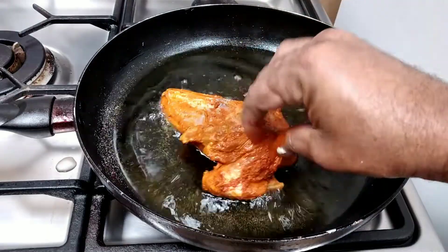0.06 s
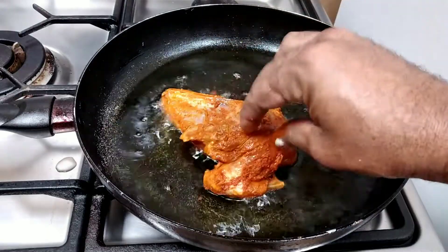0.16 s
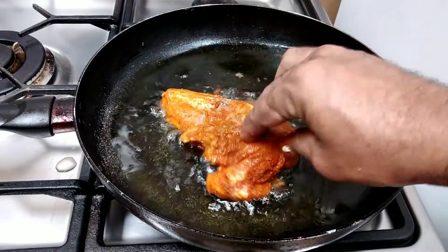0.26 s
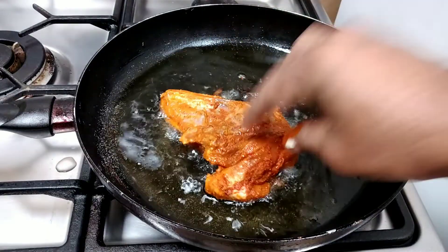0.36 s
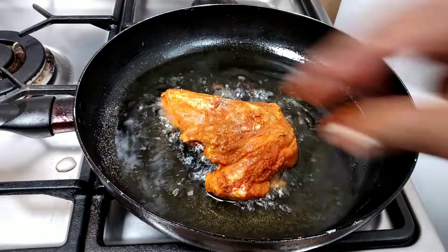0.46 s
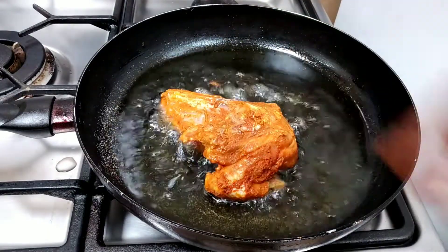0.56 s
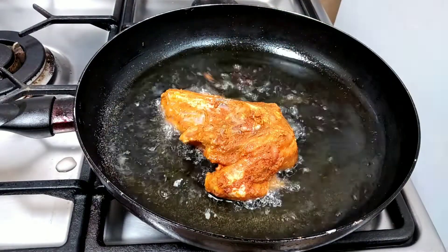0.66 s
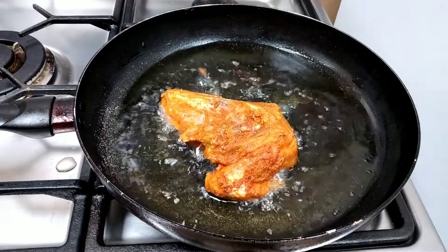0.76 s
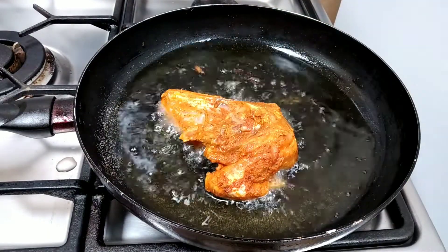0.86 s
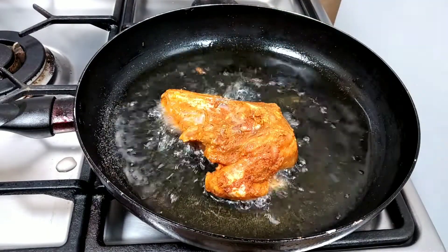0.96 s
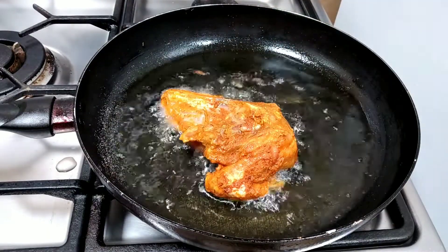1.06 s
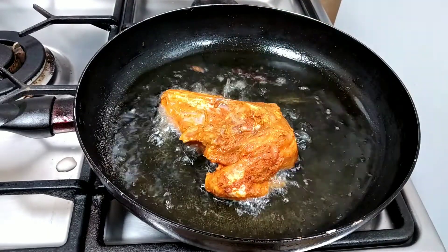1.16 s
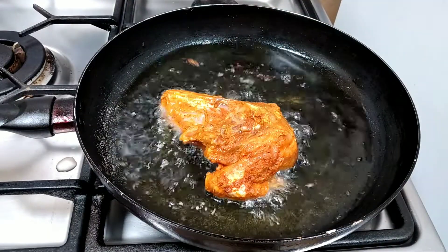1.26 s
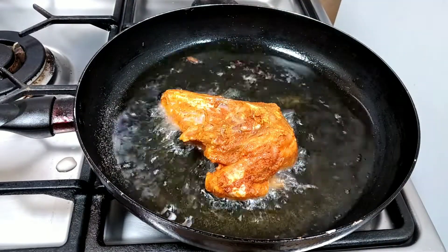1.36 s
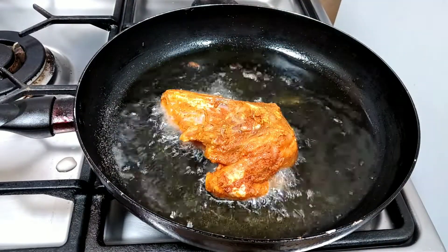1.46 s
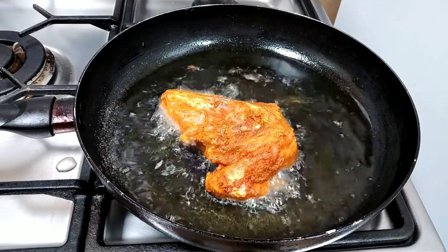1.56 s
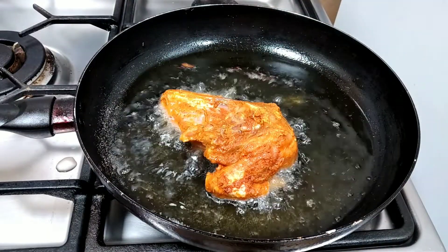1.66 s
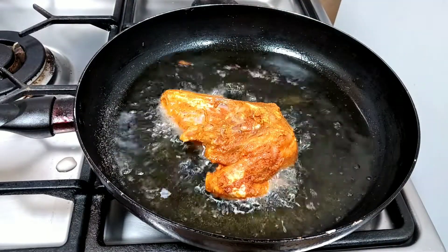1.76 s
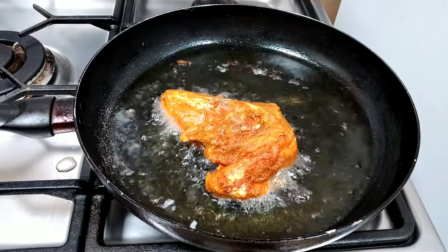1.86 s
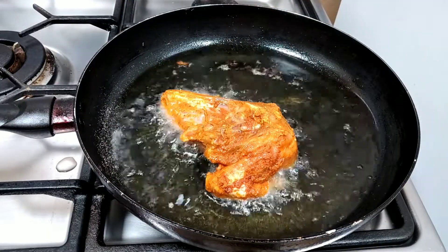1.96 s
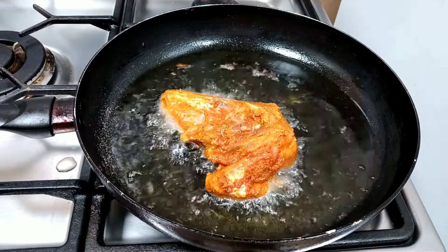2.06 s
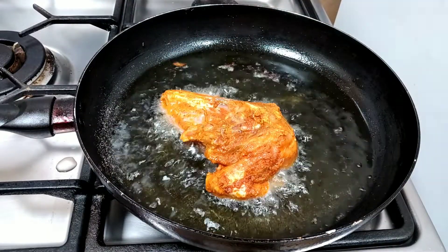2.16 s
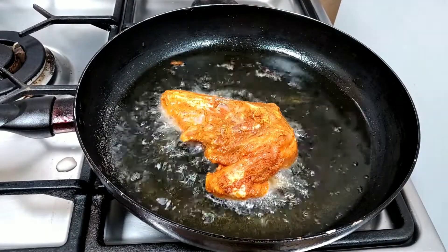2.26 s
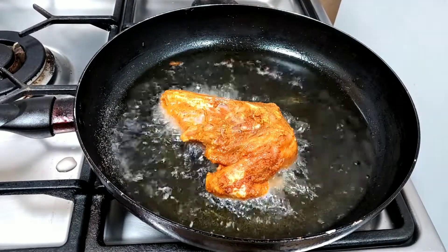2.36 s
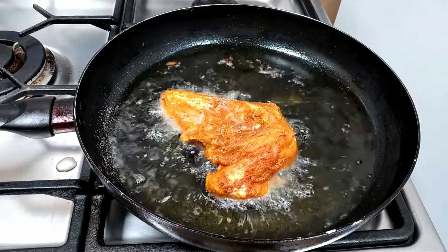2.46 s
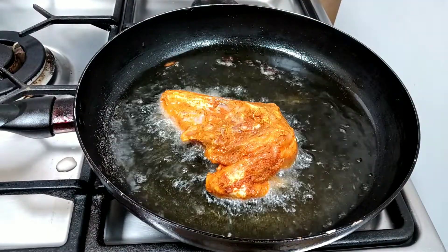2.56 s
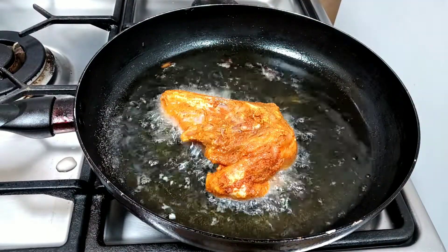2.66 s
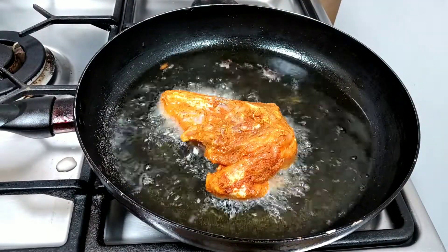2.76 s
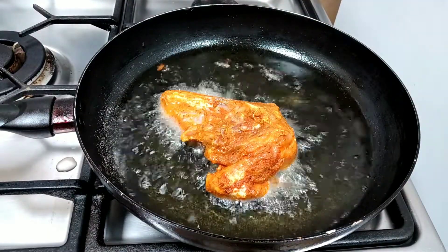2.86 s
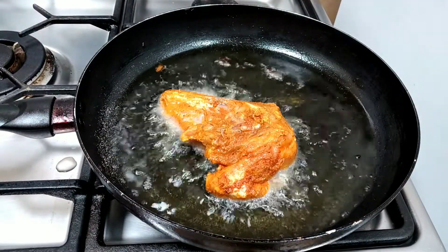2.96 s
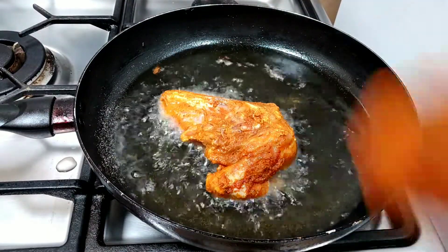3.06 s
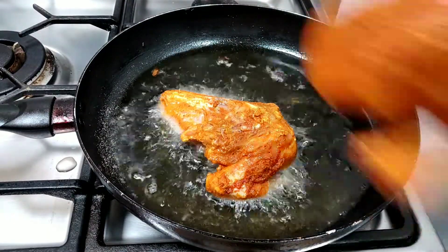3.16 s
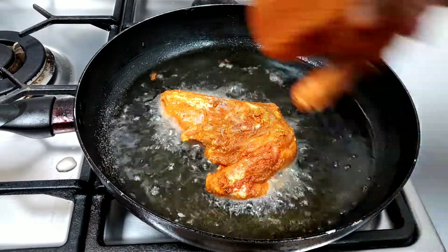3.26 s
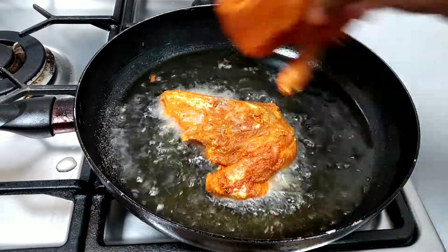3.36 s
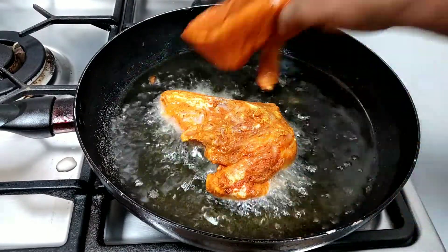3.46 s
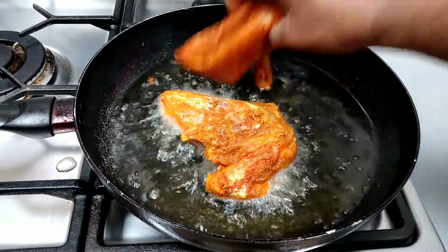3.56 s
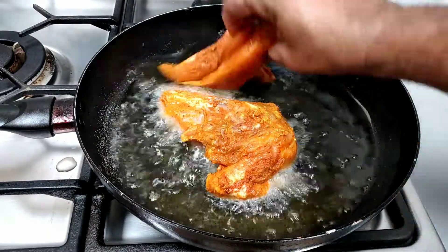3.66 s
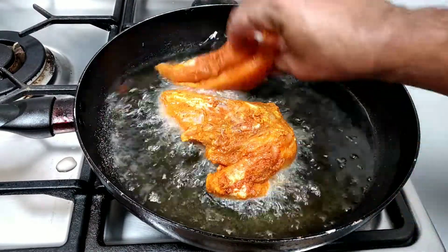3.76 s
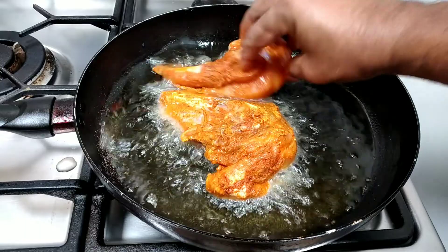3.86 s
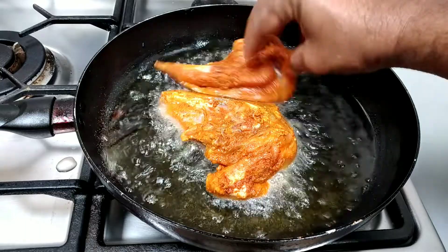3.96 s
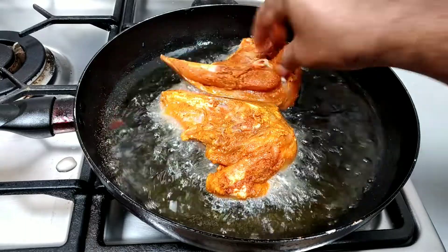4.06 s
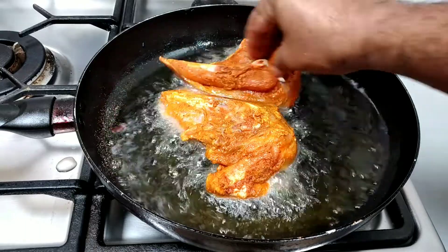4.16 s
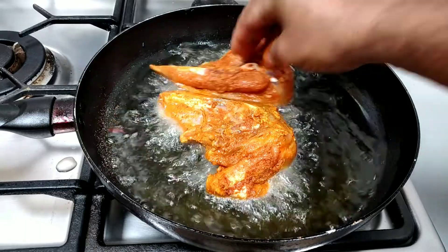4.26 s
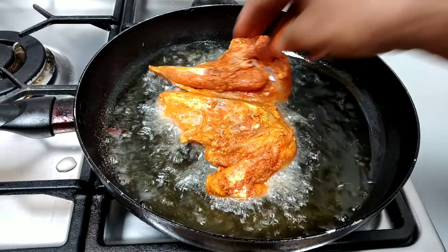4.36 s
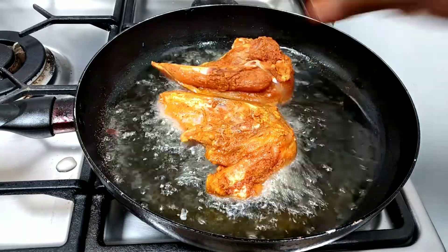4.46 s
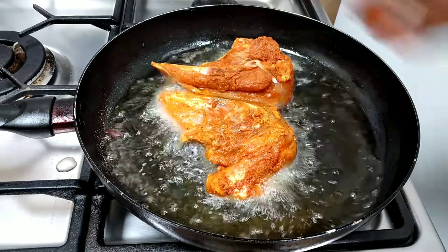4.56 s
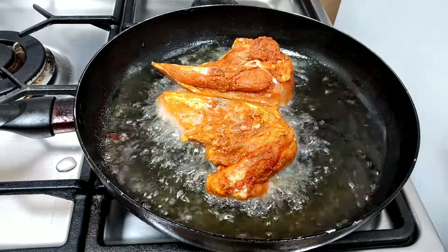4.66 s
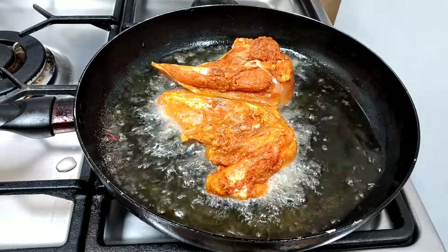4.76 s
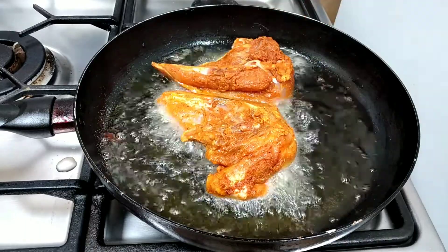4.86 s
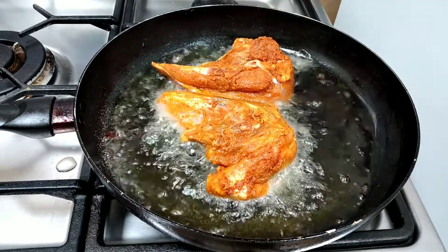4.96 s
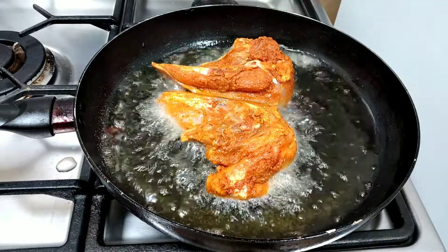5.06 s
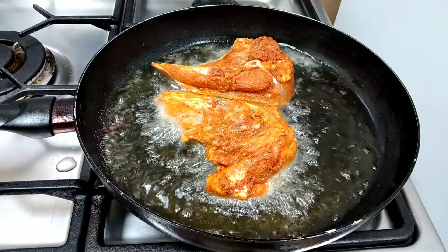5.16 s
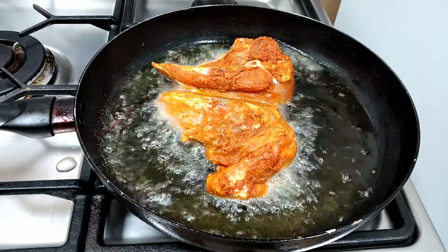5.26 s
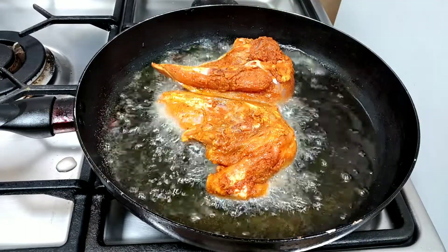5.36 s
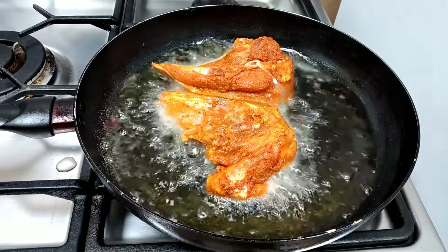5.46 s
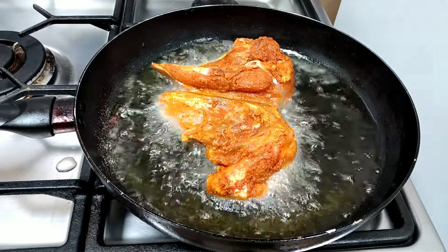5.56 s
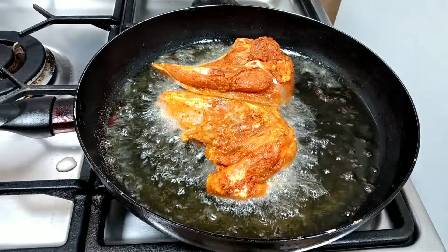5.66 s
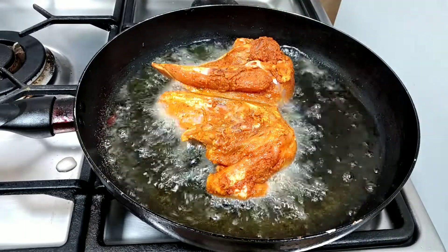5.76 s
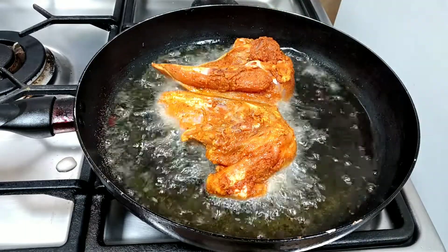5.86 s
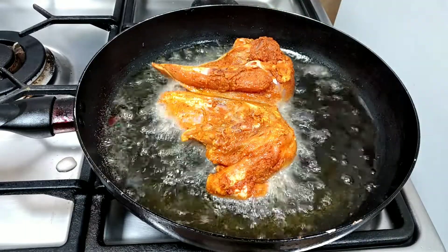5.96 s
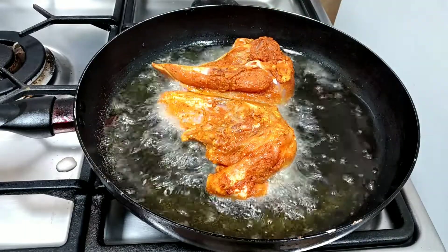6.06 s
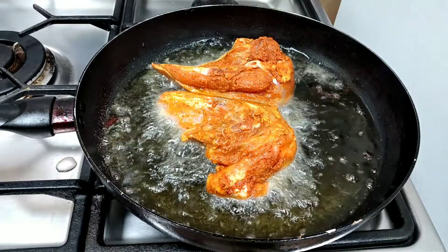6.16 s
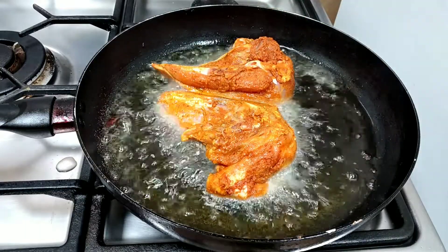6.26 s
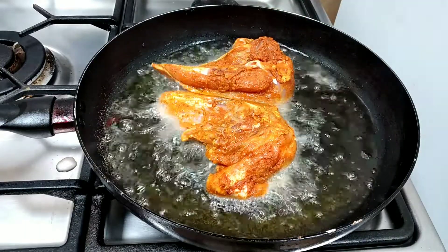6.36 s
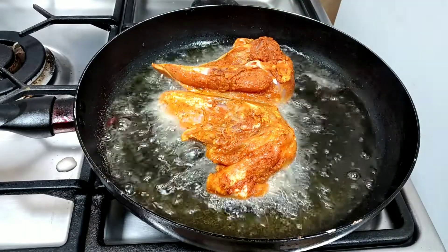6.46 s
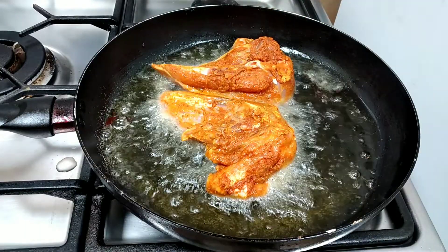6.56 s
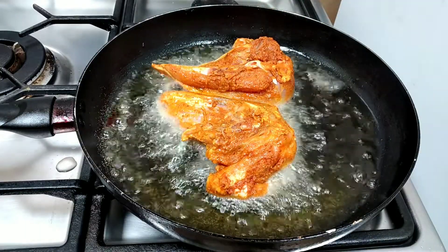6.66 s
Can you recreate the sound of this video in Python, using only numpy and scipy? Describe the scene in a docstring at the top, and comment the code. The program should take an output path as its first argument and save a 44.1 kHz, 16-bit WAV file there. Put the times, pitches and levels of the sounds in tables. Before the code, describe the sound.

Wet marinated chicken is lowered into hot oil, spluttering and popping, dying to a faint simmer, then a second piece erupts louder with hissing steam.

```python
"""Two marinated chicken pieces splutter in hot oil in a pan, close to a stereo microphone in a small kitchen.
Their wet coats boil off as swarms of ringing bubbles that rise in pitch, with splats, strings and big pops.
Fine droplets fizz and snap as clumped impulses; trapped steam hisses and squirts as filtered crackle.
A kitchen appliance hums behind it as wavering sines over soft air and burner noise."""
import sys
import numpy as np
from scipy import signal
from scipy.fft import rfft, irfft
from scipy.io import wavfile
from scipy.ndimage import uniform_filter1d

SR = 44100
rng = np.random.default_rng(int(sys.argv[2]) if len(sys.argv) > 2 else 0)


def int16_out(signal):
    """Quantize to a 16-bit WAV file."""
    q = np.round(np.clip(np.atleast_2d(signal).T, -1, 1) * 32767)
    wavfile.write(sys.argv[1], SR, q.astype(np.int16))


N = 296352
TIME = np.arange(N) / SR


def gain_of(db):
    """Decibels to amplitude."""
    return 10 ** (np.asarray(db) / 20)


def evened(x):
    """Scales to rms 1."""
    return x / np.sqrt(np.mean(x ** 2) + 1e-20)


def steadied(x, size=5000):
    """Keeps the grain of a sound but holds its slow level at 1."""
    power = uniform_filter1d((x ** 2).mean(0), size)
    return x / np.sqrt(abs(power) + 1e-12)


def read(points, hz):
    """Reads a spectrum table on a log-frequency axis."""
    f, value = np.transpose(points)
    return np.interp(np.log(hz + 1), np.log(f + 1), value)


def colour(points, size=2048):
    """Causal (minimum-phase) impulse response with the given spectrum."""
    log_gain = np.log(gain_of(read(points, abs(np.fft.fftfreq(size, 1 / SR)))))
    spectrum = np.exp(np.conj(signal.hilbert(log_gain)))
    return np.fft.ifft(spectrum).real[:size // 2]


def convolve(x, response):
    """Passes both channels through an impulse response."""
    return signal.oaconvolve(x, np.atleast_2d(response), axes=1)[:, :x.shape[1]]


def resonate(x, hz, width_hz):
    """A resonance of gain 1 that can glide: shift to 0 Hz, low-pass, shift back."""
    turn = np.exp(2j * np.pi * np.cumsum(hz * np.ones(x.shape[-1])) / SR)
    r = np.exp(-np.pi * width_hz / SR)
    return 2 * (turn * signal.lfilter([1 - r], [1, -r], x / turn + 1e-18)).real


def add(mix, s, sound):
    """Adds a stereo sound at time s."""
    part = mix[:, max(round(s * SR), 0):][:, :sound.shape[1]]
    part += sound[:, :part.shape[1]]


def placed(db, pan_db):
    """Left and right gain of a sound."""
    return gain_of([[db + pan_db / 2], [db - pan_db / 2]])


def apart(sound, lag_s):
    """A sound that reaches the left port a little after the right one."""
    late = abs(round(lag_s * SR))
    return np.array([np.pad(sound, (late, 0)), np.pad(sound, (0, late))])


def envelope(start_s, rise_s, hold_s, fade_db_per_s):
    """A straight rise, a hold, and a steady fade in dB."""
    age = TIME - start_s
    fade_s = np.maximum(age - rise_s - hold_s, 0)
    return np.clip(age / rise_s, 0, 1) * gain_of(-fade_db_per_s * fade_s)


def swell(middle_s, length_s):
    """One smooth arch of height 1."""
    return np.cos(np.pi * np.clip((TIME - middle_s) / length_s, -.5, .5))


def flutter(depth_db, slow_hz=5., fast_hz=41.01, count=24):
    """An uneven random gain: sines of random phase, summed to an rms depth in dB."""
    t, hz = TIME[::100], np.geomspace(slow_hz, fast_hz, count)[:, None]
    wave = (np.sin(2 * np.pi * (hz * t + rng.random((count, 1)))) / hz ** 0.11).sum(0)
    return np.interp(TIME, t, gain_of(depth_db * evened(wave)))


def bursts(per_s, spread_db, lag_s, scatter_s, echo=0.6, echo_s=.003, count=3):
    """Random impulses of scattered height, each with its own delay between the ports and its own echoes."""
    draws = rng.random((int(per_s * N / SR) + 1, 4 + 2 * count)).T
    when, big, place, side = draws[:4]
    height = gain_of(spread_db * np.minimum(-np.log(1 - big), 4.2))
    height = height * (-1) ** np.arange(len(when))
    late = lag_s + scatter_s * (2 * place - 1)  # right port; negative: right first
    lean = gain_of(4.9 * (2 * side - 1))
    strength = np.r_[1, echo * (-1) ** np.arange(count)][:, None]  # direct sound, then its echoes
    ports = []
    for delay, size, paths in (0, height * lean, draws[4::2]), (late, height / lean, draws[5::2]):
        arrival = delay + np.vstack([0 * when, -echo_s * np.log(1 - paths)])
        sample = (when * N + arrival * SR).astype(int).ravel() % N
        ports.append(np.bincount(sample, (strength * size).ravel(), N))
    return np.array(ports)


def ring(hz, t60, attack_cycles=0.81):
    """One bubble: it swells and dies away, its pitch creeping up; peak 1."""
    t = np.arange(int(t60 * SR) + 32) / SR
    wave = (1 - np.exp(-(t * hz / attack_cycles) ** 2)) * np.exp(-np.log(1000) * t / t60)
    wave = wave * np.sin(2 * np.pi * hz * t * (1.0225 + 0.053 * t / t60))
    return wave / abs(wave).max()


def bubbles(sizes_hz, pitch, octaves, per_s, spread_db, cycles, lag_s):
    """A swarm of ringing bubbles of sizes scattered round a typical pitch, on a wavering clock."""
    out, centre = np.zeros((2, N)), np.log2(pitch)
    for hz in sizes_hz:
        swarm = bursts(per_s / len(sizes_hz), spread_db, lag_s=lag_s, scatter_s=0.00013)
        swarm = convolve(swarm, ring(hz, cycles / hz, attack_cycles=2.07))
        out += evened(swarm) * np.exp(-.5 * ((np.log2(hz) - centre) / octaves) ** 2)
    drift = flutter(depth_db=.3, slow_hz=4., fast_hz=25.)
    clock_s = np.cumsum(drift / drift.mean()) / SR
    return steadied(np.array([np.interp(clock_s, TIME, port) for port in out]), size=2200)


def together(parts):
    """Joint level and typical pitch of several (gain, Hz) crowds of bubbles."""
    power = sum(gain ** 2 + 1e-14 for gain, hz in parts)
    return np.sqrt(power), sum((gain ** 2 + 1e-14) * hz for gain, hz in parts) / power


# Pieces. Each row: meets the oil in seconds, stays wet after lowering in seconds, gurgle in dB,
# gurgle pitch in Hz, splutter in dB, simmering gurgle in dB, simmering splutter in dB, simmer pitch in Hz.
CHICKEN_PIECES = [(-0.07, 0.11, -38.5, 770, -33, -59, -52, 1630),
                  (3.59, 1.375, -43, 954, -37, -57.5, -46, 1800)]
# Surges of splutter as oil reaches a wet patch. Each row: middle in seconds, length in seconds,
# level in dB, left-right in dB, bubble pitch in Hz.
WET_PATCH_SURGES = [(0.122, 0.092, -34.5, -10, 1600), (0.309, 0.18, -29.5, -9, 1510),
                    (0.366, 0.076, -29.5, -1, 1730), (0.444, 0.054, -31.5, -1, 1900),
                    (0.543, 0.059, -31, -6, 1660), (0.635, 0.067, -33.5, -10.5, 1800),
                    (0.781, 0.077, -34.5, -11.5, 1920), (3.696, 0.094, -46.5, -1, 2080),
                    (3.758, 0.024, -40.5, -4, 2170), (3.925, 0.17, -36, -6, 1680),
                    (4.077, 0.13, -37.5, -5, 1650), (4.56, 0.62, -34, -5, 1890),
                    (4.704, 0.29, -35, -9, 2430), (4.876, 0.12, -30.5, -4, 2700),
                    (5.1, 0.36, -31.5, -1, 2340), (5.3, 0.11, -38, 3, 2500), (6.05, 0.3, -45.5, -2, 2040),
                    (6.634, 0.058, -39, -4, 2100)]
# Ticks of the bubble skins breaking. Each row: frequency in Hz, level in dB.
SKIN_TICK_COLOUR = [(300, -6), (1500, 5), (4200, 3.5), (7000, 0), (15000, -22)]
LOWER_S = 0.31  # a piece is lowered into the oil over this time
GURGLE_FADE_DB_PER_S, SPLUTTER_FADE_DB_PER_S = 21.5, 19
WET_HZ, DRY_HZ, DRY_S = 1460, 2230, 1.13  # the bubbles shrink as the coat dries
SPLUTTER_PAN_DB = -4.5  # left-right
STIRRING_EXPONENT = 0.6  # how far a surge also stirs up the large bubbles
TICK_DB = -17  # against the splutter


def boiling():
    """Each piece gurgles going in, splutters in ever smaller bubbles while wet, then settles to a simmer."""
    gurgles, splutters = [], []
    for s, wet_s, gurgle_db, gurgle_hz, splutter_db, low_simmer_db, simmer_db, simmer_hz in CHICKEN_PIECES:
        immersed = envelope(s, LOWER_S, 0, 0)
        dryness = np.clip((TIME - s) / DRY_S, 0, 1) ** 2
        plunge = envelope(s, LOWER_S, 0, GURGLE_FADE_DB_PER_S) * immersed
        gurgles.append((gain_of(gurgle_db) * plunge, gurgle_hz))
        gurgles.append((gain_of(low_simmer_db) * immersed, gurgle_hz))
        wet = envelope(s, LOWER_S, wet_s, SPLUTTER_FADE_DB_PER_S)
        splutters.append((gain_of(splutter_db) * wet, WET_HZ * (DRY_HZ / WET_HZ) ** dryness))
        splutters.append((gain_of(simmer_db) * immersed, simmer_hz))
    gurgle, large_pitch = together(gurgles)
    splutter, _ = together(splutters)

    power = (splutter * placed(0, SPLUTTER_PAN_DB)) ** 2
    for s, length_s, db, pan_db, hz in WET_PATCH_SURGES:
        arch = swell(s, length_s)
        power = power + (placed(db, pan_db) * arch) ** 2
        splutters.append((gain_of(db) * arch, hz))
    surging = np.sqrt(power)
    _, small_pitch = together(splutters)
    stirred = (surging / splutter) ** STIRRING_EXPONENT

    large = bubbles(np.geomspace(590, 1060, 9), large_pitch, octaves=0.37, per_s=1400,
                    spread_db=5.0, cycles=13.9, lag_s=-0.0001)
    small = bubbles(np.geomspace(1180, 2880, 15), small_pitch, octaves=0.5, per_s=1400,
                    spread_db=2.8, cycles=12., lag_s=-.00018)
    skins = bursts(1500, spread_db=6.0, lag_s=0, scatter_s=.0003, echo_s=.001)
    ticks = steadied(convolve(skins, colour(SKIN_TICK_COLOUR)))
    fine = (small + gain_of(TICK_DB) * ticks) * surging * flutter(depth_db=0.84)
    return large * gurgle * stirred + fine


# Wet splats, a whole drop of marinade boiling off at once. Each row: start in seconds,
# level before the decay in dB, pitch in Hz, left-right in dB, decay in seconds.
MARINADE_SPLATS = [(0.023, -38.5, 2470, 2, 0.01), (0.103, -34, 1340, 6, 0.01), (.368, -28, 1150, -5, 0.011),
                   (.435, -40, 1400, 1, 0.019), (.461, -33, 3500, -8, 0.0069), (.534, -34.5, 690, 8, 0.027),
                   (0.790, -49, 1120, -12, 0.014), (0.791, -33.5, 3700, -2, 0.0056),
                   (.904, -37, 2870, 1, 0.0079), (.932, -40.5, 2480, -6, .012),
                   (0.976, -36, 2270, -19, 0.0059), (.988, -32.5, 1250, -15.5, 0.011),
                   (.998, -38, 2000, -14, 0.0097), (1.167, -36, 2940, -5, 0.0077),
                   (1.7622, -40.5, 2400, 5, 0.0064), (1.95, -43, 950, -3, .014),
                   (1.973, -49, 1590, -4, 0.032), (2.55, -42.5, 2190, 6, 0.0074),
                   (3.739, -35, 1520, -5, 0.026), (3.881, -30, 1506, 4, 0.025),
                   (3.944, -39, 1500, -8, .018), (4.07, -39.5, 910, -10, 0.025),
                   (4.885, -33.5, 820, -2, 0.0065), (5.129, -38, 2030, -3, 0.02),
                   (5.465, -32, 1270, 4, 0.01), (5.658, -45, 2600, 0, 0.0048),
                   (5.838, -41, 1770, 0, 0.0041), (6.5, -42, 2800, 2, 0.0068)]
SPLAT_SWELL = 0.25  # rise as a share of the decay


def splats():
    """A ragged burst of band-passed noise with a quick start and exponential decay."""
    out, t = np.zeros((2, N)), TIME[:SR // 10]
    ragged = flutter(depth_db=-1.5, slow_hz=90., fast_hz=397.5)
    for s, db, hz, pan_db, decay_s in MARINADE_SPLATS:
        noise = rng.standard_normal(len(t)) + 0.85 * rng.standard_normal((2, len(t)))  # shared + per port
        band = signal.butter(3, [hz / 1.45, hz * 1.45], "bandpass", fs=SR, output="sos")
        burst = evened(signal.sosfilt(band, noise * ragged[int(s * SR):][:len(t)]))
        shape = np.minimum(t / (SPLAT_SWELL * decay_s), np.exp(SPLAT_SWELL - t / decay_s))
        add(out, s, placed(db, pan_db) * burst * shape)
    return out


# Like-sized bubbles escaping from one spot under the meat. Each row: start in seconds, length in seconds,
# first pitch in Hz, last pitch in Hz, level in dB, left-right in dB.
BUBBLE_STRINGS = [(0.082, 0.05, 1200, 1350, -36.5, -2.5), (0.273, 0.116, 790, 750, -32.5, 0),
                  (0.548, 0.3, 1280, 1340, -44, -15), (0.633, 0.21, 755, 786, -48.5, -7),
                  (3.691, 0.04, 980, 885, -40, -3), (3.755, 0.08, 795, 1090, -38, -7),
                  (3.809, 0.029, 1100, 760, -42, 0), (3.827, 0.17, 990, 910, -40, -10),
                  (3.936, 0.047, 1400, 2430, -33, -18.5), (4, 0.11, 885, 680, -44.5, 1),
                  (4.145, 0.14, 560, 674, -45, -3), (3.982, 0.13, 2360, 2370, -38.5, -5),
                  (4.218, 0.23, 1470, 1570, -38.5, -12), (5.09, 0.15, 1930, 2320, -34, 6),
                  (6.043, 0.064, 2550, 2550, -46.5, -15)]
STRING_WIDTH_HZ = 250  # of each of two resonances in series


def strings():
    """Steam leaks from one spot as a quick run of bubbles whose pitch slides as they grow or shrink."""
    out, births = np.zeros((2, N)), bursts(420, spread_db=2.0, lag_s=-0.000053, scatter_s=.0001)
    wander = flutter(depth_db=0.5)
    for s, length_s, first_hz, last_hz, db, pan_db in BUBBLE_STRINGS:
        span = slice(int(s * SR), int((s + length_s) * SR))
        pitch = np.geomspace(first_hz, last_hz, span.stop - span.start) * wander[span]
        ringing = resonate(births[:, span], pitch, STRING_WIDTH_HZ)
        ringing = resonate(ringing, pitch, STRING_WIDTH_HZ)
        add(out, s, placed(db, pan_db) * evened(ringing * signal.windows.tukey(len(pitch), .3)))
    return out


# Single loud bubbles. Each row: start in seconds, peak level in dB, nominal pitch in Hz, left-right in dB,
# ringing in cycles to -60 dB.
BIG_BUBBLES = [(0.229, -37, 737, -16, 20), (0.302, -29, 1410, -7, 9.1), (0.283, -26, 725, -4, 17),
               (0.356, -23, 790, -6, 15), (0.361, -27, 2500, -4, 16), (0.428, -22, 1130, 1, 20),
               (0.462, -19, 1370, -3, 21), (0.505, -26, 1600, -5, 14), (0.530, -26, 675, -5, 16),
               (0.611, -23, 1234, 9, 28), (0.636, -27, 1750, -8, 14), (0.66, -30, 1900, -10, 11),
               (0.727, -26, 1320, -2, 17), (0.747, -44, 1230, -6, 22), (0.761, -27, 1320, -11, 15),
               (0.801, -28, 1170, -17, 17), (0.976, -21, 1570, -12, 7.1), (0.997, -25, 1210, -12, 6.2),
               (1.167, -28, 1154, -14, 17), (1.478, -33.5, 1355, 7, 31), (1.975, -26, 1550, -11, 8.1),
               (3.736, -22, 1420, -5, 18), (3.966, -19, 2220, -10, 14), (4.348, -17.5, 1480, -20, 14),
               (4.419, -18.5, 2580, 15, 13.6), (4.515, -19.5, 2530, 16, 14), (4.622, -21, 2360, 8, 13),
               (4.737, -11, 1680, -4, 18), (4.765, -17, 1560, -1, 9.6), (4.850, -21, 2630, 8, 23),
               (4.8845, -9, 2340, 9, 17), (4.893, -18, 2560, 4, 16), (5.021, -29, 2700, 2, 13),
               (5.045, -32, 2400, 0, 23), (5.0975, -8, 2440, -4, 26), (5.159, -23, 2000, 7, 18),
               (5.186, -21, 2230, 10, 15), (5.208, -22, 2220, 10, 16), (5.274, -23.5, 2420, 11, 18),
               (5.308, -24, 2530, 15, 20), (5.462, -17.5, 1230, -11, 4.8), (5.487, -26, 2480, 10, 18),
               (6.068, -39, 2420, -9, 19)]
POP_SWELL = 0.15  # share of its ringing that sets the swell of a big bubble
FIRST_LAG_S, SECOND_LAG_S = .0001, 0.00024  # left port delay for bubbles at each piece


def pops():
    """Single big bubbles that stand out from the swarm, each a slowly swelling ring."""
    out = np.zeros((2, N))
    for s, db, hz, pan_db, cycles in BIG_BUBBLES:
        lag_s = FIRST_LAG_S if s < CHICKEN_PIECES[1][0] else SECOND_LAG_S
        bubble = ring(hz, cycles / hz, attack_cycles=POP_SWELL * cycles)
        add(out, s, placed(db, pan_db) * apart(bubble, lag_s))
    return out


# Sharp snaps of spitting oil. Each row: start in seconds, peak level in dB, nominal pitch in Hz,
# ringing in cycles to -60 dB.
OIL_SNAPS = [(0.026, -26, 8000, 5), (0.1355, -32, 7030, 9), (0.163, -22, 6740, 66), (0.221, -30, 10900, 7),
             (0.305, -30, 7810, 18), (0.367, -24, 7600, 18), (0.462, -22, 6600, 14),
             (0.508, -20.5, 8040, 10), (0.5383, -18, 6540, 24), (0.6998, -18.5, 8550, 20),
             (0.851, -26, 8940, 12), (0.914, -33, 7290, 20), (1.012, -27, 6870, 40), (1.078, -27, 9500, 8),
             (1.103, -27, 7700, 25), (1.154, -36, 7200, 30), (1.1563, -27, 10000, 4),
             (1.1862, -27, 10000, 10), (1.189, -23, 6400, 28), (1.2275, -22, 10400, 7),
             (1.233, -29, 7870, 32), (1.2391, -20, 8050, 19), (1.302, -25, 8790, 24),
             (1.331, -25, 7930, 28), (1.394, -26, 9500, 5), (1.48, -26, 6300, 16), (1.538, -28, 11200, 20),
             (1.55, -19.5, 7550, 22), (1.644, -20, 7200, 24), (1.966, -31.5, 6900, 14),
             (2.044, -31.5, 5640, 31), (2.2812, -32, 5400, 27), (2.3495, -37, 10700, 35),
             (2.487, -38, 7500, 25), (2.556, -33, 6650, 20), (2.86, -30, 7700, 23), (3.2632, -33, 7670, 42),
             (3.819, -37, 7740, 35), (4.321, -21, 5630, 12), (4.433, -26, 7550, 28), (5.643, -43, 7500, 25),
             (6.038, -34, 7200, 12)]
DROPLETS_PER_S, DROPLETS_S, DROPLETS_DB = 2000, 0.0051, -4.5  # rate, decay, level against the snap


def snaps():
    """Spits of oil: a short high ring with a ragged, decaying tail of droplets."""
    out, t = np.zeros((2, N)), TIME[:SR // 50]
    for s, db, hz, cycles in OIL_SNAPS:
        snap = gain_of(db) * ring(hz, cycles / hz, attack_cycles=2.7)
        add(out, s, apart(snap, rng.uniform(.00014, .0004))[::-1])  # right port late
        landing = rng.random(len(t)) < DROPLETS_PER_S / SR
        droplets = rng.standard_normal((2, len(t))) * landing * np.exp(-t / DROPLETS_S)
        add(out, s, gain_of(db + DROPLETS_DB) * convolve(droplets, ring(hz, 4 / hz)))
    return out


# Colour of the fizz. Each row: frequency in Hz, level in dB.
FINE_FIZZ_COLOUR = [(300, -9), (1200, 15.5), (2500, -5.5), (3800, -1), (5500, 9), (8000, 10), (12000, 7.5),
                    (16000, 7)]
# Colour of the coarser drops that spit out of the first spray. Each row: frequency in Hz, level in dB.
COARSE_SPIT_COLOUR = [(500, -30), (2500, -3), (4200, -2.5), (6500, -3), (10000, -16), (16000, -4)]
# Colour of the fizz in the crowded pan. Each row: frequency in Hz, level in dB.
CROWDED_FIZZ_COLOUR = [(300, 8.5), (1200, 18), (2500, 5), (3800, 6.5), (5500, 8.5), (8000, 6.5), (12000, 1),
                       (16000, -1)]
# the spray is fierce until the underside of the first piece is seared, then drops to a trickle
SPRAY_DB, SPRAY_RISE_S, SEALED_S, SEAL_DB_PER_S = -38.5, 0.18, 1.63, 216
TRICKLE_DB, CROWDED_DB, CROWD_DELAY_S, CROWD_S = -55, -45.5, 0.36, 0.7  # builds again under the second
SPIT_DB, SPIT_FADE_DB_PER_S = -1.5, 2.5  # against the spray; they weaken as the coat dries


def fizz():
    """Tiny droplets tick in clumps as they flash to steam; an even, denser crackle joins with the second piece."""
    first_s, second_s = (piece[0] for piece in CHICKEN_PIECES)
    hold_s = SEALED_S - first_s - SPRAY_RISE_S
    spray = gain_of(SPRAY_DB) * envelope(first_s, SPRAY_RISE_S, hold_s, SEAL_DB_PER_S)
    sparse = steadied(bursts(6000, spread_db=3.5, lag_s=.0003, scatter_s=.00025, echo=.55, echo_s=0.001))
    clumps = flutter(depth_db=2.0, slow_hz=13.0, fast_hz=130.0)
    sparse = sparse * clumps * np.hypot(spray, gain_of(TRICKLE_DB))
    dense = steadied(bursts(8000, spread_db=4.5, lag_s=0, scatter_s=0.00027))
    dense = dense * gain_of(CROWDED_DB) * envelope(second_s + CROWD_DELAY_S, CROWD_S, 0, 0)
    spits = evened(bursts(390, spread_db=-1.0, lag_s=0.00017, scatter_s=.0003, echo_s=.002))
    spits = spits * gain_of(SPIT_DB - SPIT_FADE_DB_PER_S * TIME) * spray
    layers = [(sparse, colour(FINE_FIZZ_COLOUR)), (spits, colour(COARSE_SPIT_COLOUR)),
              (dense, colour(CROWDED_FIZZ_COLOUR))]
    return sum(convolve(ticks, tick / np.linalg.norm(tick)) for ticks, tick in layers)


# Colour of the steam hiss. Each row: frequency in Hz, level in dB.
STEAM_COLOUR = [(500, -17), (4000, -7.5), (4850, -21), (5100, 2.5), (6500, 5), (8500, -1), (9400, -8),
                (9700, -25), (12000, -48), (16000, -23)]
# Colour of its brightest jets. Each row: frequency in Hz, level in dB.
BRIGHT_JET_COLOUR = [(500, -62), (7000, -15.5), (9000, 18), (10500, 14), (11900, 15), (12600, -44),
                     (16000, -43)]
# Puffs within the rush. Each row: middle in seconds, length in seconds, hiss in dB, bright jets in dB.
STEAM_PUFFS = [(4.048, 0.3, -35.5, -39.5), (4.215, 0.24, -42.5, -59), (4.36, 0.083, -33, -49),
               (4.5, 0.11, -35, -52), (4.565, 0.093, -45, -42), (4.666, 0.12, -33, -48),
               (4.742, 0.3, -44, -38), (4.918, 0.11, -35.5, -51), (5.053, 0.13, -36, -65),
               (5.208, 0.17, -34, -51), (5.402, 0.099, -34.5, -66), (5.534, 0.28, -37.5, -52),
               (5.654, 0.04, -41, -59)]
# steam trapped under the second piece builds, holds, sags and runs out
RUSH_START_S, RUSH_RISE_S, RUSH_HOLD_S, RUSH_END_S, RUSH_RELEASE_S = 4.13, 0.38, 0.62, 6.04, 0.56
RUSH_DB, RUSH_SAG_DB_PER_S, RUSH_JETS_DB, SEEP_DB = -35.5, 17, -60, -66.5


def hiss():
    """Steam seeps faintly throughout and rushes out from under the second piece in puffs of bright crackle."""
    crackle = bursts(12000, spread_db=5.5, lag_s=0, scatter_s=.0003)
    body = steadied(convolve(crackle, colour(STEAM_COLOUR)))
    jets = steadied(convolve(crackle, colour(BRIGHT_JET_COLOUR)))
    release = np.clip((RUSH_END_S - TIME) / RUSH_RELEASE_S, 0, 1)
    rush = envelope(RUSH_START_S, RUSH_RISE_S, RUSH_HOLD_S, RUSH_SAG_DB_PER_S) * release
    body_gain, jet_gain = gain_of(RUSH_DB) * rush, gain_of(RUSH_JETS_DB) * rush
    for s, length_s, hiss_db, jets_db in STEAM_PUFFS:
        arch = swell(s, length_s)
        body_gain = np.hypot(body_gain, gain_of(hiss_db) * arch)
        jet_gain = np.hypot(jet_gain, gain_of(jets_db) * arch ** 2)
    rushing = (body * body_gain + jets * jet_gain) * flutter(depth_db=1.4)
    return rushing + body * gain_of(SEEP_DB) * flutter(depth_db=1.5)


PIP_HZ, PIP_DB = 6670, -8  # typical pitch; level against the sizzle


def pips(sizzle):
    """The harder the oil sizzles, the louder the pinhead bubbles that ring briefly in it."""
    swarm = bubbles(np.geomspace(5400, 11000, 8), PIP_HZ, octaves=0.32, per_s=550,
                    spread_db=5.0, cycles=30., lag_s=-0.000055)
    sizzle_level = np.sqrt(abs(uniform_filter1d((sizzle ** 2).mean(0), size=1500)))
    return gain_of(PIP_DB) * swarm * sizzle_level


# Squirts of trapped steam. Each row: start in seconds, length in seconds, first pitch in Hz,
# last pitch in Hz, level before the final colour in dB.
STEAM_SQUIRTS = [(1.795, 0.04, 10200, 11600, -55.5), (1.817, 0.12, 5240, 5660, -65),
                 (2.037, 0.099, 6600, 7400, -57), (2.213, 0.12, 5300, 5900, -55),
                 (2.217, 0.12, 7300, 7300, -71), (2.331, 0.049, 6000, 9600, -53),
                 (2.338, 0.068, 10400, 11200, -58), (2.468, 0.2, 5300, 6100, -60),
                 (2.548, 0.076, 6600, 10100, -51.5), (2.782, 0.11, 5040, 8300, -54),
                 (2.842, 0.12, 7900, 9700, -57), (2.995, 0.098, 5040, 8200, -56.5),
                 (3.032, 0.06, 10300, 11000, -53.5), (3.1, 0.092, 6500, 7700, -56.5),
                 (3.253, 0.066, 7850, 8400, -54.5), (3.408, 0.04, 6440, 7000, -61.5),
                 (3.538, 0.073, 10300, 11000, -61.5), (3.597, 0.17, 6900, 6950, -59)]
SQUIRT_WIDTH_HZ, SQUIRT_SPRAY_DB = 1140, -15  # width of each resonance; stray droplets round the jet
SQUIRT_SKEW = 0.58  # below 1: early peak


def squirts():
    """A steam pocket empties in fits: ragged crackle, steady or rising in pitch as it shrinks, with stray droplets."""
    out = np.zeros((2, N))
    crackle = bursts(1700, spread_db=3.5, lag_s=.0002, scatter_s=0.00017, echo=0.43)
    crackle = crackle * flutter(depth_db=3.5, slow_hz=28.75, fast_hz=253.0)
    pitch_scatter = flutter(depth_db=.95, slow_hz=70., fast_hz=300.)
    for s, length_s, first_hz, last_hz, db in STEAM_SQUIRTS:
        span = slice(int(s * SR), int((s + length_s) * SR))
        age = np.linspace(0, 1, span.stop - span.start)
        hz = first_hz * (last_hz / first_hz) ** age * pitch_scatter[span]
        spray = resonate(crackle[:, span], hz, SQUIRT_WIDTH_HZ)
        jet = resonate(spray, hz, SQUIRT_WIDTH_HZ) + gain_of(SQUIRT_SPRAY_DB) * spray
        add(out, s, gain_of(db) * evened(jet * np.sin(np.pi * age ** SQUIRT_SKEW)))
    return convolve(out, colour([(500, -24), (4300, 3.5), (5200, 6.5), (16000, 5)]))  # (Hz, dB)


# Colour of single ticks on the open oil. Each row: frequency in Hz, level in dB.
OPEN_OIL_COLOUR = [(500, -25), (3500, -13), (6000, 3), (10000, -4), (16000, -3)]
PRICKLE_DB = -59


def prickles():
    """Separate dry ticks of droplets bursting on the open oil, at one level throughout."""
    ticks = bursts(70, spread_db=2.5, lag_s=.0002, scatter_s=.0002, echo=.45, echo_s=.0012)
    return gain_of(PRICKLE_DB) * evened(convolve(ticks, colour(OPEN_OIL_COLOUR)))


# Resonances of the pan. Each row: frequency in Hz, width in Hz, level in dB.
PAN_MODES = [(552.6, 16, 7.5), (660, 37, 0.5), (784, 23, 0.5), (847, 11, -10.5), (1150, 160, -2.5),
             (1436, 37, -5), (1946, 27, -11), (2370, 42, -20), (2456, 115, -10), (2550, 61, -14),
             (3260, 33, -1)]


def pan(x):
    """Sound in the pan sets its metal ringing: the direct sound plus a bank of resonances."""
    tap = signal.unit_impulse(SR // 4)
    return convolve(x, tap + sum(gain_of(db) * resonate(tap, hz, width_hz) for hz, width_hz, db in PAN_MODES))


# Kitchen reverberation. Each row: frequency in Hz, time to -60 dB in seconds.
KITCHEN_T60 = [(200, 0.093), (1500, 0.17), (6000, 0.13), (15000, 0.17)]


def kitchen(x, room_db):
    """The short tail of the room: noise that decays at its own rate in each band."""
    t = TIME[:SR // 2]
    noise = rng.standard_normal((2, len(t))) * (t > .005)
    hz, frame_s, z = signal.stft(noise, SR, nperseg=256)
    decay = np.exp(-np.log(1000) * frame_s / read(KITCHEN_T60, hz)[:, None])
    tail = signal.istft(z * decay, SR, nperseg=256)[1]
    return x + gain_of(room_db) * convolve(x, tail / np.linalg.norm(tail, axis=1, keepdims=True))


# Motor hum. Each row: frequency in Hz, rms level in dB, waver in dB rms (sign immaterial).
MOTOR_HUM = [(38, -64, -6), (45.6, -63.5, 6.5), (47.9, -60, 5.5), (79, -71, 7), (95.8, -62.5, 2),
             (98.7, -64.5, 5.5), (113.9, -54.5, 0), (140.7, -65, 2.5), (199, -80, 3), (292.2, -62.5, 0.9),
             (340.6, -69.5, 0.5), (455.7, -63.5, 1), (555, -66, 1.5)]
# Steady air and burner noise. Each row: frequency in Hz, relative density in dB per Hz.
AIR_SPECTRUM = [(10, -7), (28, -10), (65, -0.5), (110, 4), (150, 0.5), (200, 0), (280, -2), (380, -4),
                (700, 1.5), (1300, -1.5), (2000, -5.5), (3000, -15.5), (5000, -22), (16000, -54)]
# Likeness of that noise at the two ports. Each row: frequency in Hz, correlation from 0 to 1.
AIR_CORRELATION = [(60, 0.89), (130, 1), (290, 0.71), (640, 0.75), (1400, 0.43), (3000, 0.4)]
AIR_DB = -49.5  # rms


def background():
    """Wavering motor hum over a soft rush of air, nearly the same at both ports in the bass."""
    hz = np.fft.rfftfreq(N, 1 / SR)
    a, b = rfft(rng.standard_normal((2, N)))
    same = np.clip(read(AIR_CORRELATION, hz), -1, 1)
    ports = np.array([a, same * a + np.sqrt(1 - same ** 2) * b])
    air = irfft(ports * gain_of(read(AIR_SPECTRUM, hz)), N)
    hum = np.zeros(N)
    for f, db, waver_db in MOTOR_HUM:
        tone = np.sin(2 * np.pi * (f * TIME + rng.random()))
        hum += gain_of(db) * evened(tone * flutter(waver_db, slow_hz=0.623, fast_hz=6.))
    return gain_of(AIR_DB) * evened(air) + hum


def scene():
    """Boiling and splats ring the pan; all frying sounds get the kitchen tail; the background joins dry."""
    sizzle = fizz() + hiss()
    frying = pan(boiling() + splats()) + strings() + pops() + snaps()
    frying = frying + sizzle + pips(sizzle) + squirts() + prickles()
    return kitchen(frying, room_db=-7.5) + background()


# Treble resonance of the left microphone port. Each row: frequency in Hz, level in dB.
LEFT_PORT_COLOUR = [(100, 0.5), (700, -2), (1400, 0), (2400, 3), (4000, 7), (5500, 4), (6500, 3),
                    (7800, 12), (8600, 2), (10000, 0), (12000, -10), (15500, -10.5)]
# Treble resonance of the right microphone port. Each row: frequency in Hz, level in dB.
RIGHT_PORT_COLOUR = [(100, 1.5), (700, -1), (1400, -1.5), (2400, -1), (4000, 8), (6000, 0), (8000, 1),
                     (9500, 7.5), (10800, 13.5), (12000, 7.5), (13000, 3.5), (15500, -3)]
EDGE_HZ = 15550  # low-pass


def record(dry):
    """The two ports colour the treble; then the band limit."""
    ported = convolve(dry, np.array([colour(LEFT_PORT_COLOUR), colour(RIGHT_PORT_COLOUR)]))
    low_pass = signal.firwin(401, EDGE_HZ, window=("kaiser", 9), fs=SR)
    return signal.oaconvolve(ported, low_pass[None], "same")


dry = scene()
out = record(dry)
int16_out(out)
```